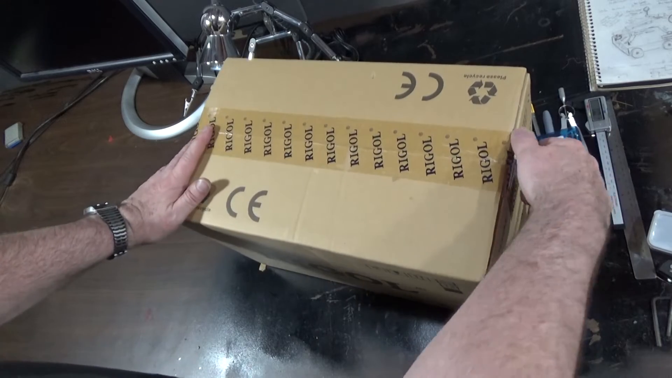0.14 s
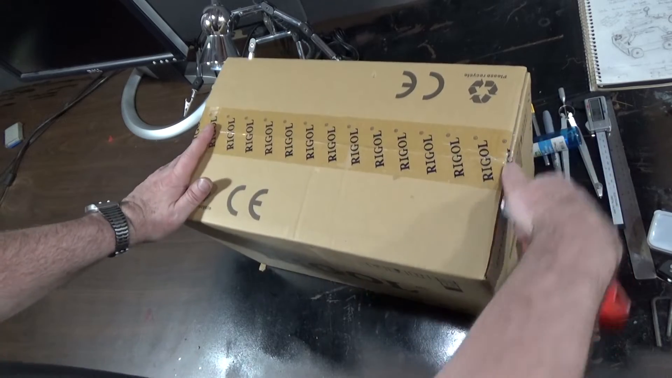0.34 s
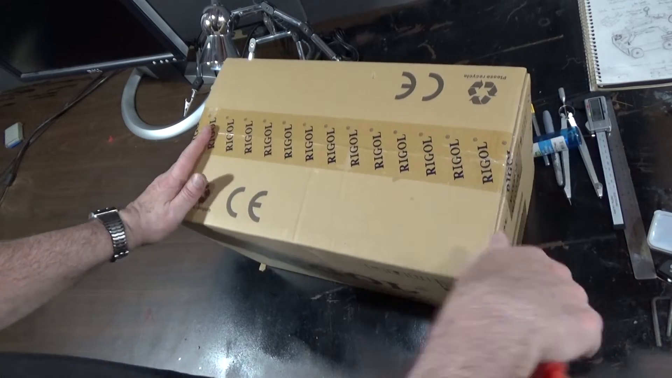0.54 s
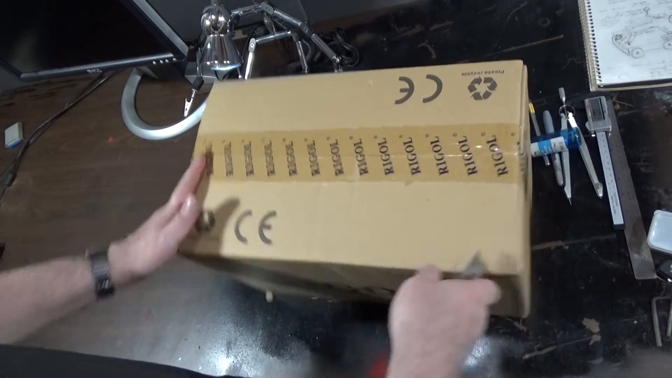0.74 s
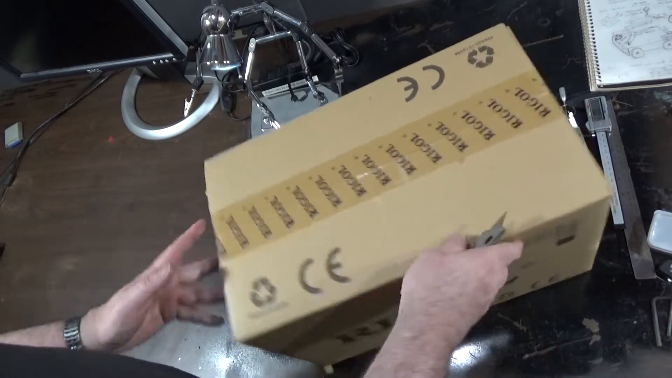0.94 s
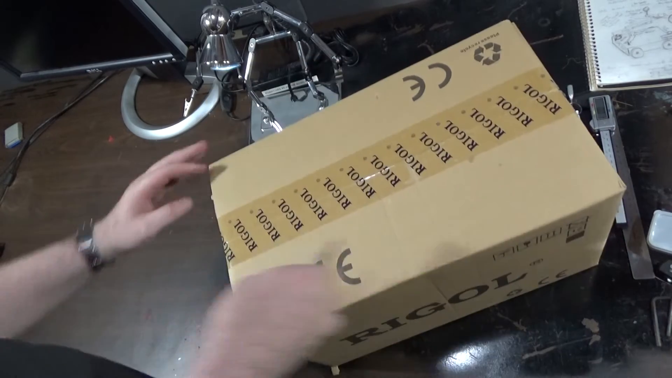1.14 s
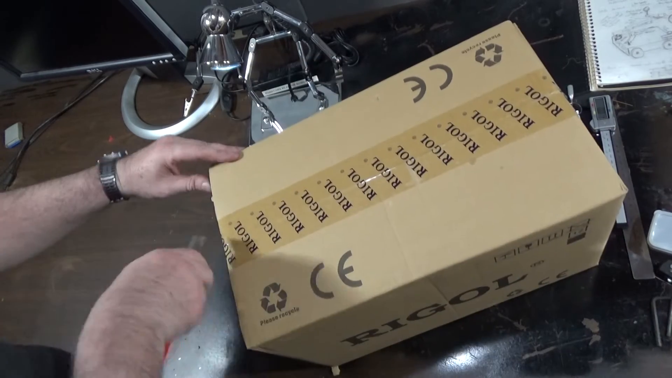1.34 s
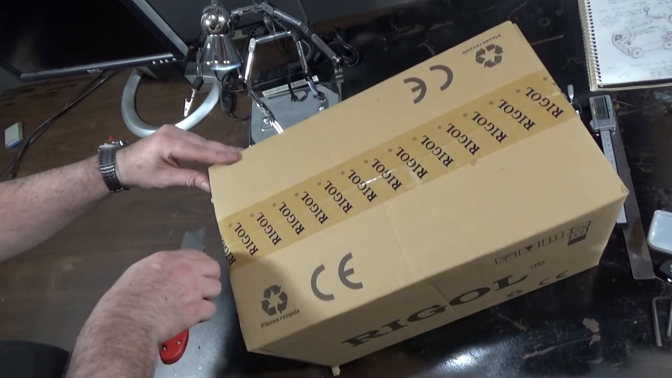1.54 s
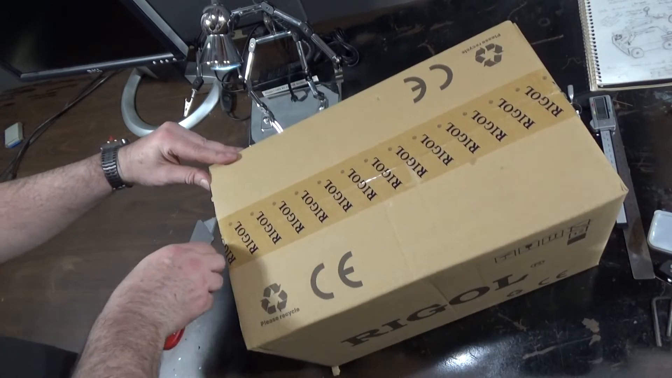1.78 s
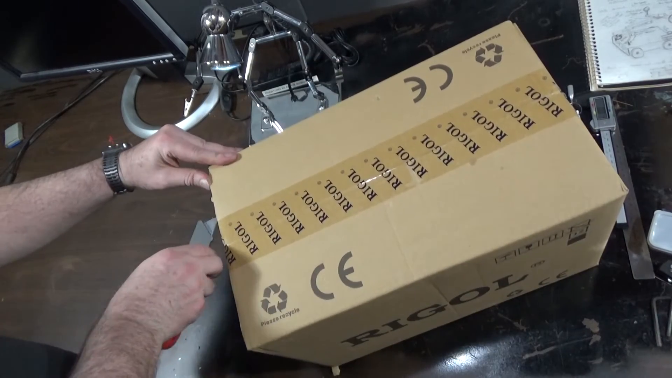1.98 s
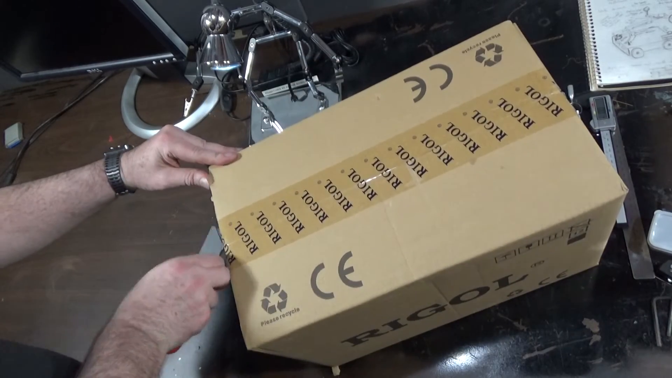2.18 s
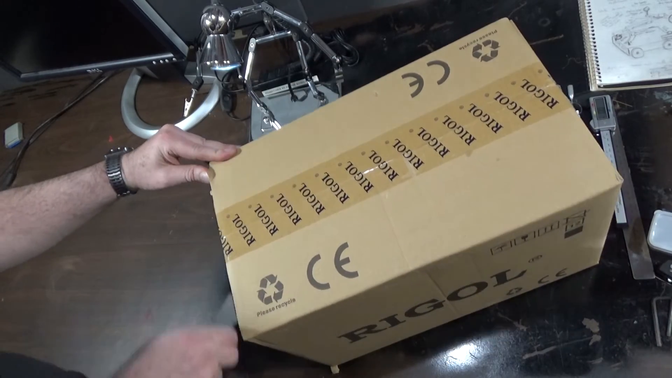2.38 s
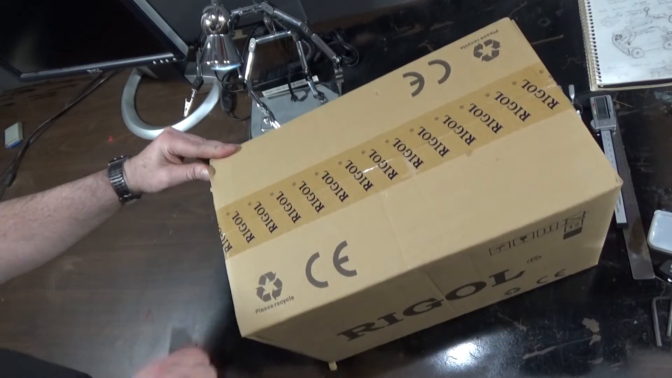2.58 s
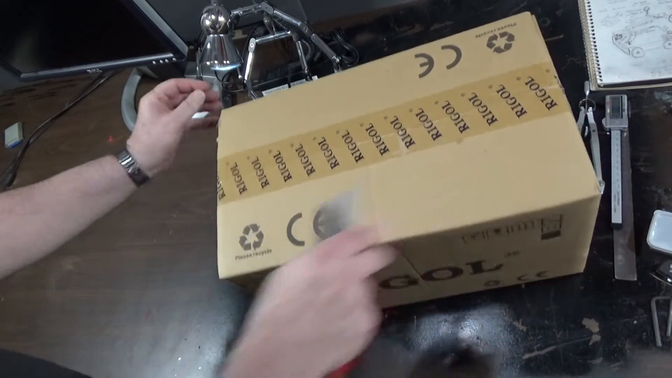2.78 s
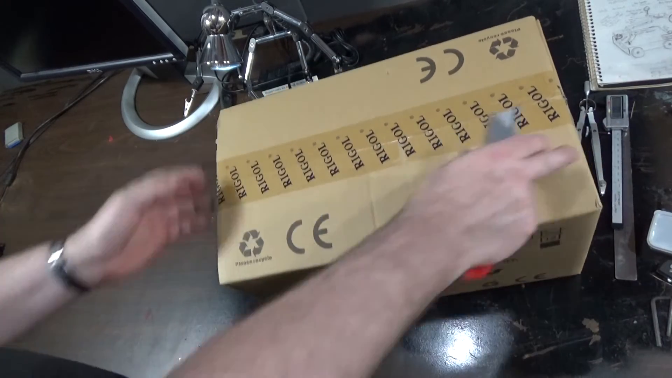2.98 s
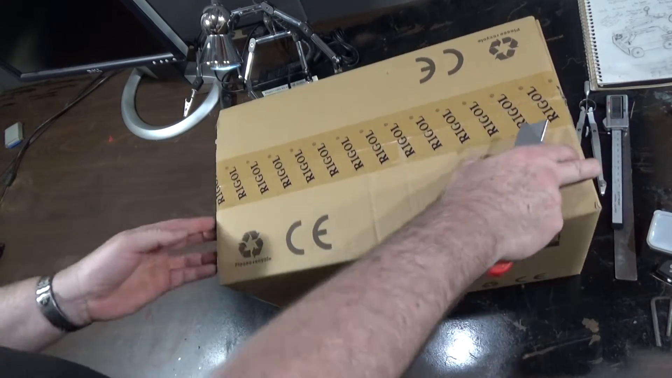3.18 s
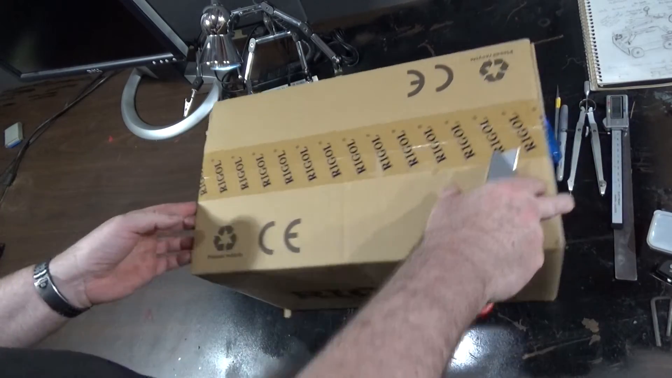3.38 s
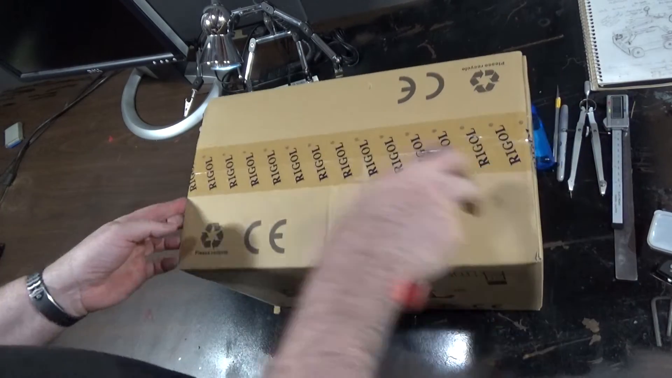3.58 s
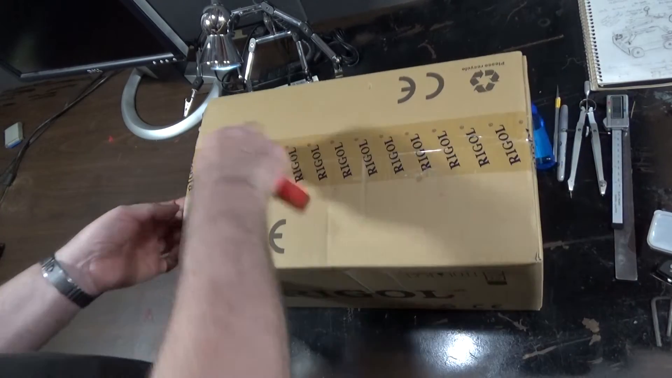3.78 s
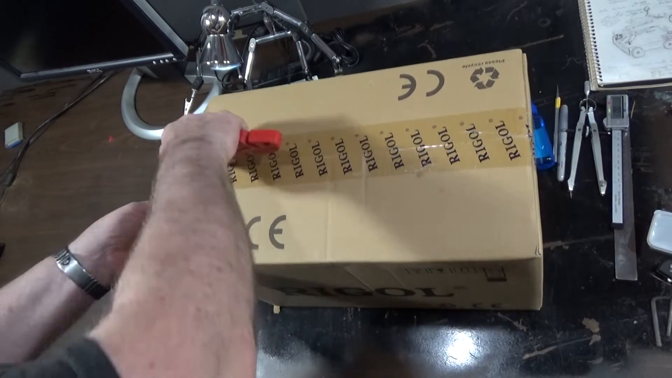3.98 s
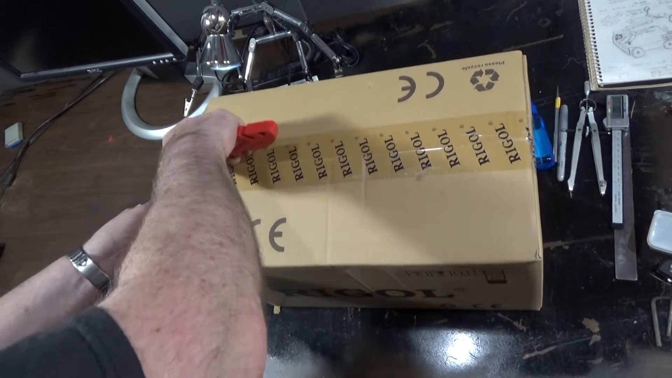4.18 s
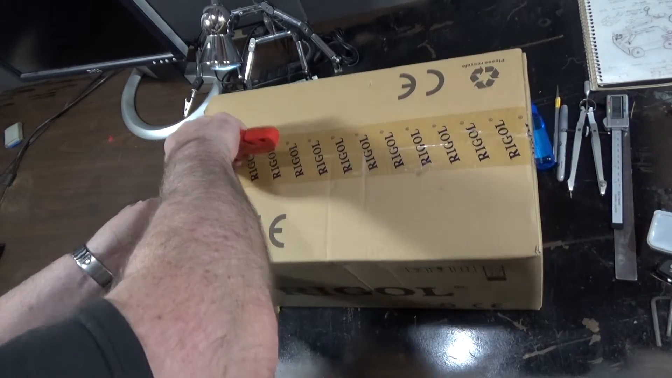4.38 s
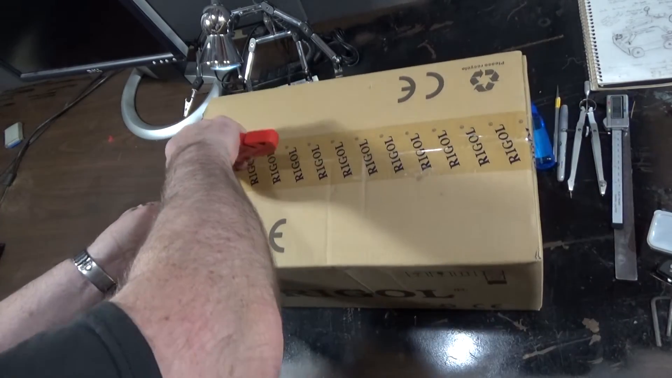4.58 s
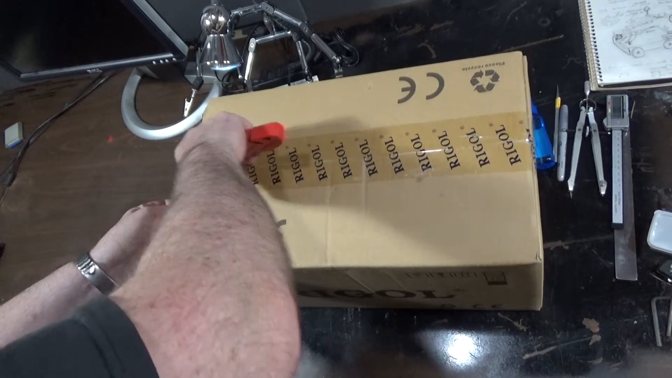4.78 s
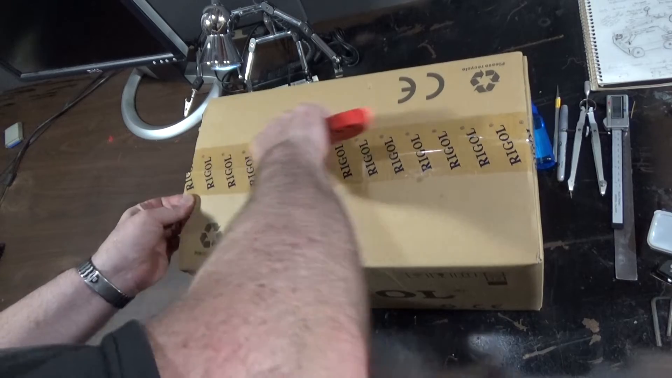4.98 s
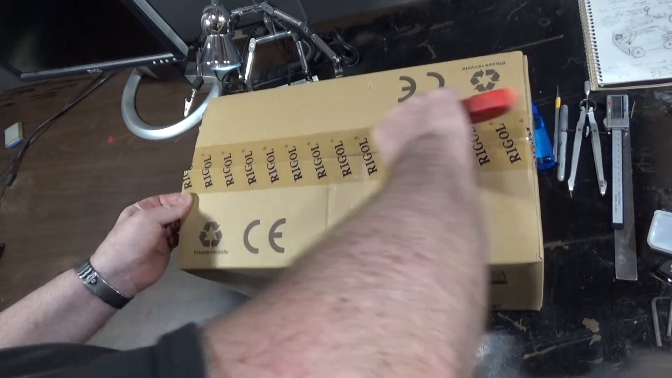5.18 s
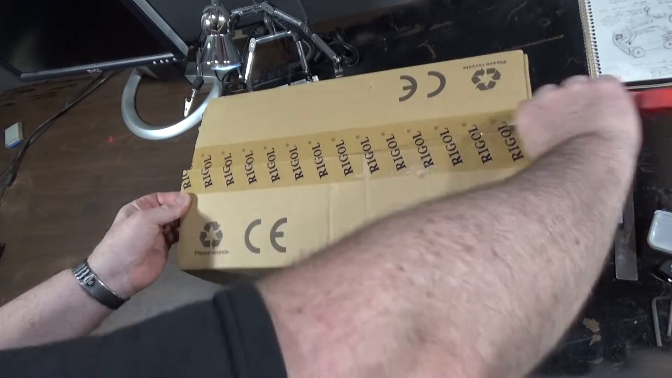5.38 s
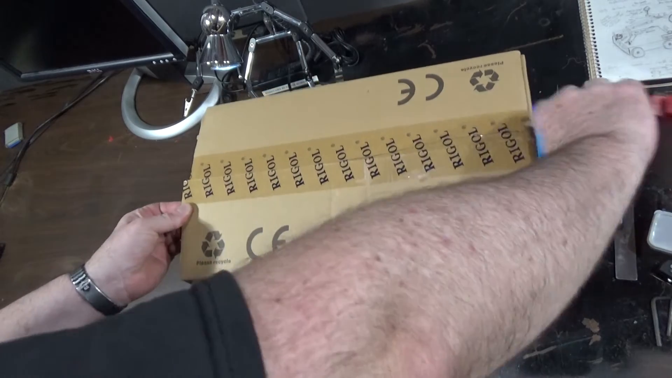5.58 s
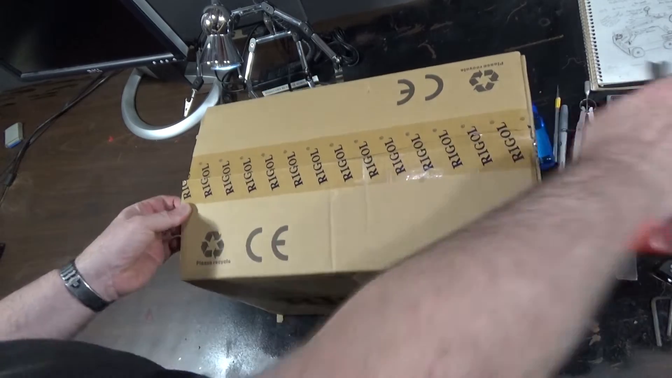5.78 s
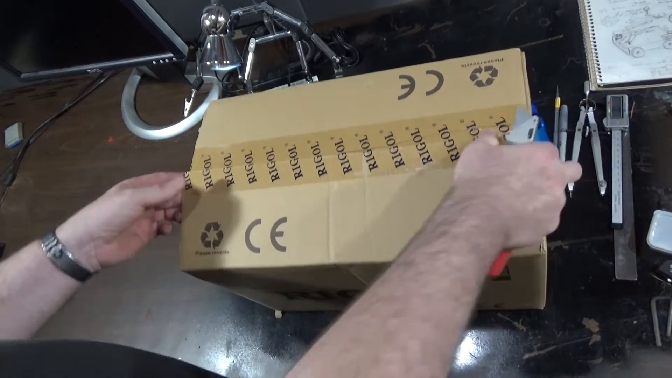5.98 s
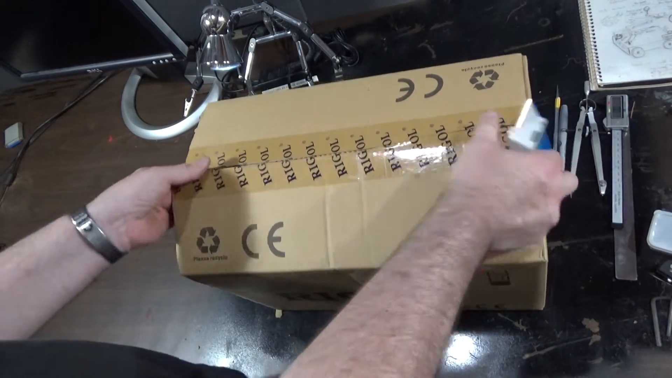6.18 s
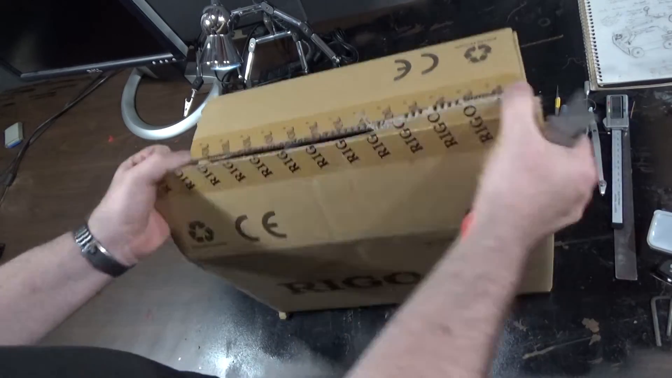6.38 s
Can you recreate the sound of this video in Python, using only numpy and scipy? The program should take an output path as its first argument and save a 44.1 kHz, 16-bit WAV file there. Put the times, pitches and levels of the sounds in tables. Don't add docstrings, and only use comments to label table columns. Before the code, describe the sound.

Close to the microphones in a small, quiet room, tape crackles dryly, then cardboard slides with a bright hiss. The hollow box lands and bounces in a quick fading cluster. Light ticks, finger pats and knocks follow, with snappy short scrapes and another slide. After a quieter handling passage, a blade tears quickly along the lid, loud and raspy. Rubbing and soft knocks lead to peeling crackles and a last heavy thud.

```python
import sys
import numpy as np
from scipy import signal
from scipy.io import wavfile
from scipy.ndimage import uniform_filter1d

SR = 44100
rng = np.random.default_rng(int(sys.argv[2]) if len(sys.argv) > 2 else 0)


def wav_out(sig):
    wavfile.write(sys.argv[1], SR, np.round(np.clip(np.atleast_2d(sig).T, -1, 1) * 32767).astype(np.int16))


def voltage_ratio(decibels):
    exponent = np.asarray(decibels, float) / 20
    return 10 ** exponent


N = 283803

# f/Hz, level/dB (per Hz)
HISS = [(2500, -28.5), (4200, -5), (5200, -3), (6300, 3), (8600, 2), (10400, -6.5), (12600, -17),
        (15500, -26.5)]
# f/Hz, level/dB (per Hz)
RASP = [(550, -7), (950, -4), (1600, -0.5), (2250, 1), (3000, 0), (4000, -0.5), (5200, -8), (8000, -103)]


def evened(x):
    return x / np.sqrt(np.mean(x ** 2) + 1e-20)


def read(points, hz):
    f, value = np.transpose(points)
    return np.interp(np.log(hz + 1), np.log(f + 1), value)


def coloured(x, points):
    hz = abs(np.fft.fftfreq(4096, 1 / SR))
    log_gain = np.log(voltage_ratio(np.maximum(read(points, hz), -90)))
    taps = np.fft.ifft(np.exp(np.conj(signal.hilbert(log_gain)))).real[:2048]
    taps = taps.reshape((1,) * (x.ndim - 1) + (-1,))
    return signal.oaconvolve(x, taps, axes=-1)[..., :x.shape[-1]]


def ring(x, modes):
    out = np.zeros(len(x))
    for k, (hz, width, db) in enumerate(modes):
        r = np.exp(-np.pi * width / SR)
        swing = signal.lfilter([1 - r], [1, -r * np.exp(2j * np.pi * hz / SR)], x).imag
        out += (-1) ** k * voltage_ratio(db) * swing
    return out


def add(mix, s, sound):
    part = mix[round(s * SR):][:len(sound)]
    part += sound[:len(part)]


def slips(per_s, spread_db):
    size = voltage_ratio(spread_db * np.minimum(rng.exponential(1, N), 4))
    return size * rng.choice([-1., 1.], N) * (rng.random(N) < per_s / SR)


def flutter(span_s, depth_db):
    waver = uniform_filter1d(rng.standard_normal(N), max(round(span_s * SR), 1))
    return voltage_ratio(depth_db * evened(waver))


def patchy(x, depth_db):
    z = signal.stft(x, nperseg=256)[2]
    field = uniform_filter1d(rng.standard_normal(z.shape), size=6, axis=0)
    field = uniform_filter1d(field, size=16, axis=1)
    return signal.istft(z * voltage_ratio(depth_db * evened(field)), nperseg=256)[1][:N]


def controls():
    # t/s, speed/dB, load/dB
    long_cut = [
        (4.761, -47, -59),
        (4.783, -33, -38),
        (4.95, -26, -34),
        (4.975, -24, -27.5),
        (5.07, -19, -19),
        (5.21, -22, -20.5),
        (5.27, -25, -28),
        (5.32, -20.5, -13.5),
        (5.462, -24, -32),
    ]
    # start t/s, peak t/s, end t/s, speed/dB, load/dB
    strokes = [(0.11, 0.121, .18, -37, -39), (0.143, .32, 0.51, -32, -47),
               (0.363, 0.53, .585, -32.5, -36.5), (0.628, 0.738, 0.87, -32.5, -50.5),
               (0.65, 0.875, 1.063, -20, -39.5), (0.886, 1.005, 1.11, -26, -32.5),
               (0.992, 1.046, 1.266, -47, -32.5), (1.255, 1.283, 1.65, -51.5, -56),
               (2.183, 2.184, 2.41, -39.5, -42), (2.287, 2.375, 2.493, -33.5, -33),
               (2.355, 2.5, 2.575, -34.5, -53), (2.6, 2.735, 2.87, -24, -38),
               (2.794, 2.868, 2.95, -38.5, -51.5), (3.127, 3.127, 3.25, -80, -40.5),
               (3.197, 3.4, 3.64, -25.5, -44.5), (3.48, 3.532, 3.72, -47, -38),
               (3.642, 3.738, 4.0, -48, -54), (5.45, 5.459, 5.515, -27, -34.5),
               (5.49, 5.677, 5.798, -42.5, -40), (5.77, 5.918, 6.0, -51, -42),
               (5.958, 5.982, 6.2, -35.5, -37.5), (6.06, 6.248, 6.5, -21.5, -34.5),
               (6.287, 6.374, 6.45, -26.5, -27.5)]
    rest_speed_db, rest_load_db = -64, -62
    ends_db, bend = -31.5, 1.846

    t = np.arange(N) / SR
    s, *cut = np.transpose(long_cut)
    gains = voltage_ratio(np.array([np.interp(t, s, c, -99, -99) for c in cut]))
    gains += voltage_ratio(np.array([[rest_speed_db], [rest_load_db]]))
    for start, peak, end, *db in strokes:
        near = slice(max(round((2 * start - peak) * SR), 0), round((2 * end - peak) * SR))
        before = (peak - t[near]) / (peak - start)
        after = (t[near] - peak) / (end - peak)
        away = np.maximum(before, after)
        gains[:, near] += voltage_ratio(np.array(db)[:, None] + ends_db * away ** bend)
    return 20 * np.log10(gains)


def rubbing():
    # middle t/s, length t/s, hiss level/dB, rasp level/dB, drum level/dB
    scuffs = [(0.496, 0.1, -17.5, -28, -35), (1.779, 0.035, -43.5, -45, -45),
              (1.926, 0.041, -57, -52, -45.5), (2.077, 0.034, -44, -45, -43),
              (2.162, 0.023, -45, -38.5, -51), (2.204, 0.03, -19, -23, -65), (2.337, 0.059, -27, -36, -66),
              (2.474, 0.017, -19, -30, -61), (2.925, 0.02, -73, -45, -60), (2.995, 0.067, -43, -53, -50),
              (3.063, 0.02, -71, -37.5, -67), (3.147, 0.028, -39, -52, -56), (3.802, 0.016, -37, -67, -58),
              (3.913, 0.026, -34, -46, -43), (5.38, 0.081, -42, -29, -26), (4.109, 0.023, -54, -50, -44),
              (4.306, 0.018, -54, -52, -41), (4.371, 0.028, -39.5, -50, -58), (1.11, 0.19, -63, -43, -60),
              (5.571, 0.037, -27, -36.5, -34.5), (5.651, 0.055, -16.5, -22, -43),
              (6.142, 0.036, -30, -37, -23), (6.228, 0.015, -18, -21, -20.5), (6.344, 0.1, -33, -18.5, -21)]
    # f/Hz, width f/Hz, level/dB
    panels = [(339.6, 62, -1.5), (503, 180, -4), (634, 126, -4), (742, 94, 1), (973, 810, -23.5)]
    # f/Hz, width f/Hz, level/dB
    hollow = [(67, 84, -22.5), (101, 130, -8.5), (148, 26, 1), (211.8, 30, 3.5)]
    # f/Hz, width f/Hz, level/dB
    flaps = [(270, 40, -0.5), (336, 41, 1), (423, 33, 0), (507, 53, -1.5), (615, 180, -6), (813, 185, -6)]
    # start t/s, end t/s
    slit = [
        (1.0, 1.24),
        (4.97, 5.48),
    ]

    t = np.arange(N) / SR
    speed, load = controls()
    hiss, drum = voltage_ratio(speed), voltage_ratio(load)
    rasp = voltage_ratio(-11 + 0.64 * speed + 0.14 * load)
    keep = np.exp(-1 / (0.017 * SR))
    boom = signal.lfilter([1 - keep], [1, -keep], voltage_ratio(-6.5 + 0.9 * load))
    grit = evened(slips(300, spread_db=3))
    tear = voltage_ratio(-2 + speed + load) * grit

    for middle, length, *db in scuffs:
        swell = np.hanning(max(round(1.55 * length * SR), 8))
        for gain, peak_db in zip((hiss, rasp, drum), db):
            add(gain, middle - len(swell) / SR / 2, voltage_ratio(peak_db - 6) * swell)

    fibres = slips(12000, spread_db=2) * flutter(0.0082, depth_db=1.59)
    catches = slips(900, spread_db=0) * flutter(0.022, depth_db=1.32)
    rough = fibres * rng.choice([-1., 1.], N) + 0.37 * evened(catches)
    board = evened(coloured(rough, RASP))
    on_flaps = sum((t > a) & (t < b) for a, b in slit)
    body = np.where(on_flaps, evened(ring(catches, flaps)), evened(ring(catches, panels)))
    scrape = hiss * evened(coloured(fibres, HISS)) + rasp * board + coloured(tear, HISS)
    return patchy(scrape, depth_db=2.5) + drum * body + boom * evened(ring(catches, hollow))


def snaps():
    # t/s, peak level/dB
    tape_snaps = [(1.273, -28.5), (1.5883, -32), (1.6726, -29.5), (1.8357, -34.5), (2.0647, -29),
                  (2.1794, -7.5), (2.2308, -20.5), (2.2613, -27), (2.3516, -6.5), (2.4693, -14.5),
                  (2.835, -22.5), (2.9692, -25.5), (3.5414, -9.5), (3.904, -27), (4.1071, -35),
                  (4.776, -14.5), (5.4936, -20), (5.8466, -30), (5.9716, -22), (5.9788, -20),
                  (6.0955, -15.5), (6.1444, -13), (6.1893, -5)]
    # t/s, peak level/dB
    ticks = [(1.0036, -9), (1.7639, -31), (2.9836, -17.5), (3.2011, -32), (3.7364, -8), (3.8427, -14.5),
             (3.8856, -28), (4.2934, -20.5), (4.3006, -19.5), (4.7017, -36), (4.9641, -10.5), (5.0282, -8),
             (6.0654, -27)]
    # t/s, peak level/dB
    pats = [(.0628, -38), (.1146, -43), (.594, -34.5), (1.506, -33), (1.9001, -31.5), (1.9474, -40),
            (2.0408, -39), (2.1555, -41), (2.5262, -24), (3.0594, -37), (3.1263, -27.5), (3.9315, -31),
            (3.9429, -29.5), (4.362, -31), (4.4039, -25.5), (4.6229, -35), (4.7531, -33), (4.7834, -20.5),
            (4.8648, -19), (5.9229, -27), (6.0327, -26.5)]
    # t/s, peak level/dB
    crackles = [(.1336, -12.5), (.1484, -27), (.1634, -33), (.1864, -16.5), (.195, -10), (.2004, -8.5),
                (.2084, -16), (.2134, -23), (.2229, -10.5), (.2409, -13), (.2484, -12), (.2604, -38),
                (.2693, -11.5), (.2987, -6), (.3024, -27), (.3114, -15), (.3204, -21), (.3304, -12),
                (.3404, -25), (.3454, -18), (.3775, -15.5), (6.2265, -18), (6.2525, -4.5), (6.2721, -6),
                (6.301, -3), (6.317, -5)]
    # f/Hz, level/dB (per Hz)
    crack_tone = [(2500, -142), (5000, 2.5), (8500, 6.5), (11000, -9), (15000, -36)]
    # f/Hz, level/dB (per Hz)
    edge_tone = [(6000, -61), (9500, 19), (13000, 7), (15500, -13)]
    # events, crack dB, edge dB, rasp dB, fizz dB, fizz t60 in s
    kinds = ((tape_snaps, -0.5, -27, -12.5, -9, 0.05),
             (ticks, -2.5, -18, -18, -8, 0.035),
             (pats, -2, -25, -7, -2, 0.01),
             (crackles, -1, -16.5, -14, -13.5, 0.018))

    t = np.arange(3000) / SR
    layers = np.zeros((3, N))
    for rows, *colour, fizz_db, t60 in kinds:
        fade = voltage_ratio(-60 * t / 0.0036) + voltage_ratio(fizz_db - 60 * t / t60)
        for s, db in rows:
            burst = fade * rng.standard_normal(len(t)) + 2.4 * (t == 0)
            for layer, less_db in zip(layers, colour):
                add(layer, s + 0.00054, voltage_ratio(db + less_db - 8) * burst)
    crack, edge, rasp = layers
    out = voltage_ratio(6) * coloured(crack, crack_tone)
    out += voltage_ratio(9) * coloured(edge, edge_tone)
    return out + voltage_ratio(19) * coloured(rasp, RASP)


def blows(rows, wall_db, t60, modes):
    t = np.arange(8000) / SR
    out = np.zeros(N)
    fall = voltage_ratio(-60 * t / t60) * (1 - np.exp(-t / 0.0024))
    for s, db, hz, *more_db in rows:
        panel = np.sin(2 * np.pi * hz * t)
        panel += 0.4 * np.sin(2 * np.pi * 1.8 * hz * t)
        panel += 0.14 * np.sin(2 * np.pi * 0.616 * hz * t)
        wall = ring(rng.standard_normal(len(t)) * voltage_ratio(-60 * t / 0.016) + 9 * (t == 0), modes)
        wall *= voltage_ratio(wall_db + sum(more_db)) / abs(wall).max()
        add(out, s + 0.0021, voltage_ratio(db - 3) * (panel * fall + wall))
    return out


def knocks():
    # t/s, peak level/dB, panel f/Hz
    palm = [(.128, -23.5, 160), (.442, -16, 156), (1.835, -24, 208), (2.068, -24.5, 191), (3.056, -31, 208),
            (3.825, -29, 245), (3.904, -32, 369), (4.1, -23, 231), (4.5, -32, 213), (4.963, -14, 310),
            (5.551, -18, 263), (5.842, -28.5, 374), (5.904, -19.5, 160), (5.973, -15.5, 181),
            (6.137, -13.5, 150)]
    # t/s, peak level/dB, panel f/Hz
    knuckle = [(.192, -29.5, 200), (1.784, -31.5, 156), (2.215, -16.5, 161), (2.352, -9, 209.5),
               (2.984, -32.5, 228), (3.142, -28, 220), (3.538, -11, 210), (4.294, -33.5, 216),
               (4.604, -40, 206), (4.776, -21, 216)]
    # t/s, peak level/dB, panel f/Hz
    blade = [(1.758, -40.5, 176), (1.895, -37.5, 132), (1.956, -44, 103), (2.038, -49, 360),
             (2.528, -32, 366), (3.629, -36, 141), (3.735, -33, 400), (4.401, -39.5, 227), (5.65, -17, 228)]
    # f/Hz, width f/Hz, level/dB
    upper_wall = [(580, 230, -1.5), (794, 60, 7), (1280, 1020, -7.5)]
    out = blows(palm, wall_db=-7.5, t60=0.059, modes=upper_wall)
    out += blows(knuckle, wall_db=1.4, t60=0.069, modes=upper_wall)
    return out + blows(blade, wall_db=11.4, t60=0.077, modes=upper_wall)


def landings():
    # t/s, peak level/dB, panel f/Hz, bottom flap level/dB
    drops = [
        (.887, -13.5, 141, 2),
        (1.005, -10.5, 199.4, 6),
        (1.034, -15.5, 226, 1),
        (1.072, -16, 207, -3),
        (1.114, -17.5, 191, -8),
        (1.15, -21, 200, -17),
        (1.253, -30, 126, -6),
        (6.327, -9.5, 101, -2),
    ]
    # f/Hz, width f/Hz, level/dB
    bottom = [(402, 22, 3), (560, 96, 3.5), (720, 170, -4), (1170, 900, -6)]
    return blows(drops, wall_db=0.5, t60=0.08, modes=bottom)


def shudders():
    # middle t/s, length t/s, level/dB
    swells = [
        (0.906, 0.092, -34.5),
        (1.303, 0.12, -45),
        (3.16, 0.21, -49.5),
        (5.67, 0.31, -40),
        (6.323, 0.14, -38),
    ]
    # f/Hz, width f/Hz, level/dB
    table_top = [(38, 24, 0), (71.5, 30, -1)]
    gain = np.zeros(N)
    for middle, length, db in swells:
        add(gain, middle - length / 2, voltage_ratio(db) * np.hanning(round(length * SR)))
    return gain * evened(ring(rng.standard_normal(N), table_top))


def room(x):
    # f/Hz, t/s
    fade_times = [(200, 0.16), (2000, 0.077), (12000, 0.11)]
    size = SR // 3
    taps = np.zeros((2, size))
    slots = np.arange(60, size - 20, 20)
    at = slots + rng.integers(0, 20, (2, len(slots)))
    np.put_along_axis(taps, at, rng.choice([-1., 1.], at.shape), 1)
    hz, t, z = signal.stft(taps, SR, nperseg=128)
    fade = voltage_ratio(-60 * t / read(fade_times, hz)[:, None])
    tail = signal.istft(z * fade, SR, nperseg=128)[1]
    return signal.fftconvolve(x[None], tail / np.linalg.norm(tail[0]), axes=1)[:, :N]


def air():
    # f/Hz, level/dB (per Hz)
    murmur = [(15, -41), (25, -22), (111, -6), (666, -11), (763, -17), (974, -10.5), (1920, -11.5),
              (2140, -10), (2590, -23.5), (8090, -19), (15100, -32), (16400, -36)]
    return voltage_ratio(-56) * evened(coloured(rng.standard_normal((2, N)), murmur))


def scene():
    # f/Hz, level/dB
    apart = [(60, -20), (120, -28), (240, -24), (480, -15.5), (950, -11.5), (1890, -12.5), (3770, -11),
             (7520, -18), (15000, -5.5)]
    box = rubbing() + snaps() + knocks() + landings() + shudders()
    wet, far = room(box), air()
    mid = box + voltage_ratio(-11) * wet[0] + far[0]
    side = coloured(wet[1] - voltage_ratio(-17) * box + voltage_ratio(8.5) * far[1], apart)
    return np.array([mid + side, mid - side])


def band_limit(x):
    return signal.sosfilt(signal.butter(12, 16520, fs=SR, output="sos"), x)


def record(dry):
    # f/Hz, level/dB
    microphone = [(15, -37), (60, 1.5), (15600, -2), (16600, -45)]
    finished = 0.66 * np.tanh(coloured(dry, microphone) / 0.68)
    return band_limit(finished)


dry = scene()
out = record(dry)
wav_out(out)
```